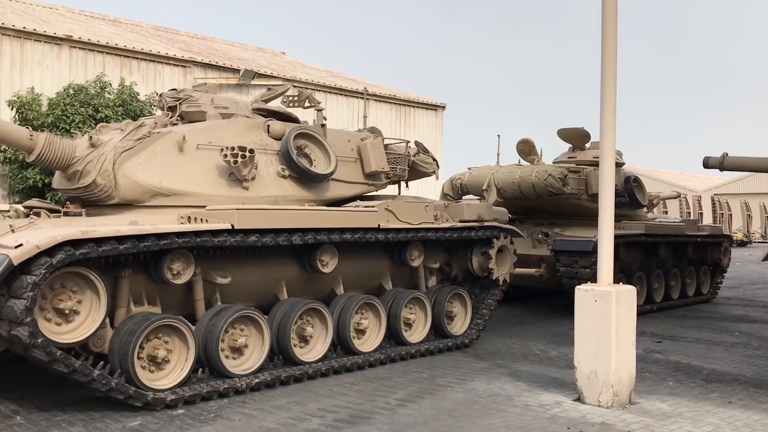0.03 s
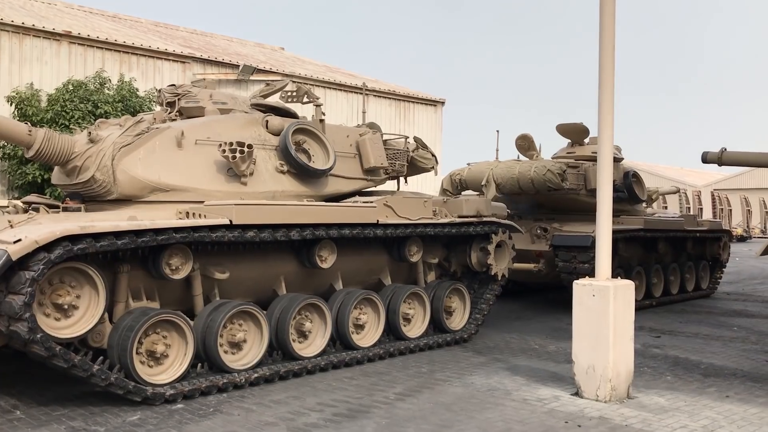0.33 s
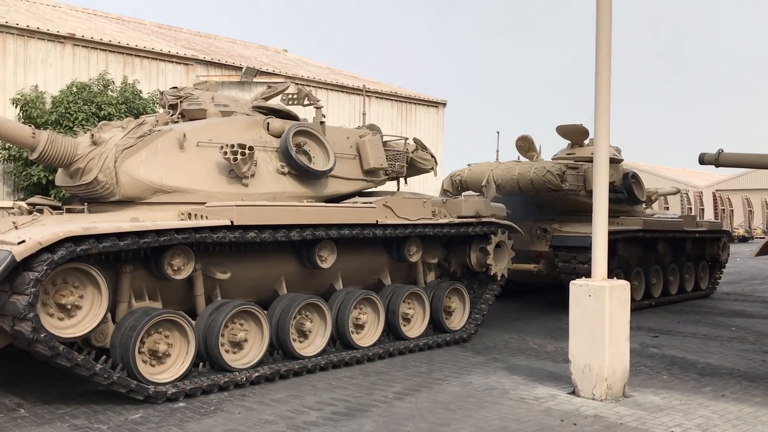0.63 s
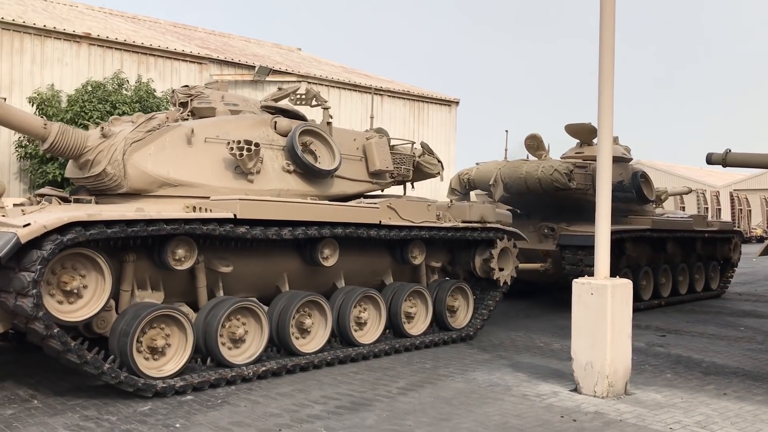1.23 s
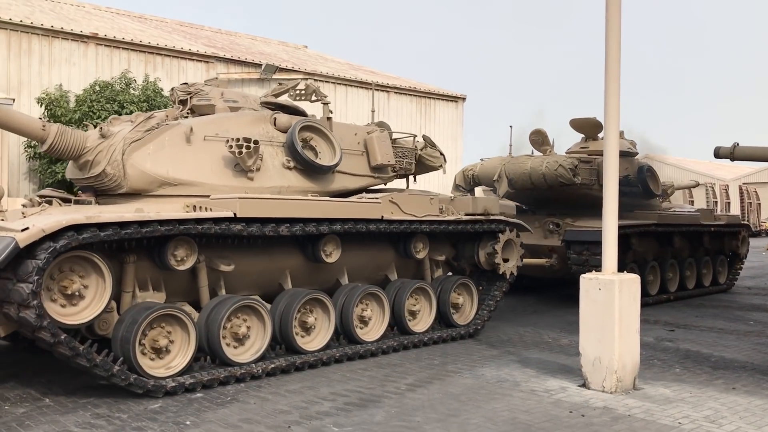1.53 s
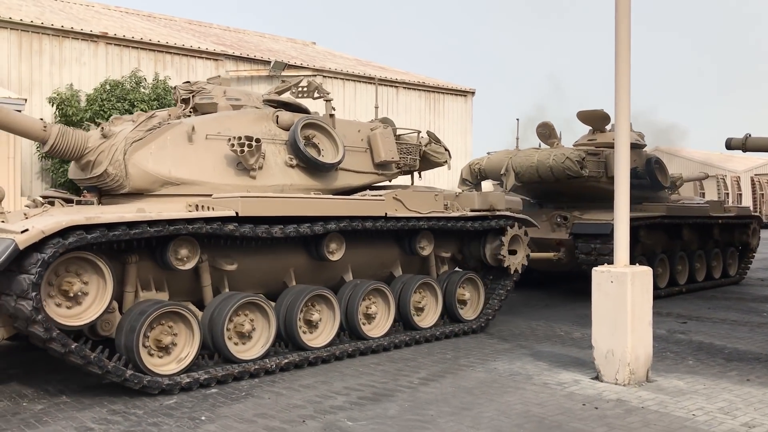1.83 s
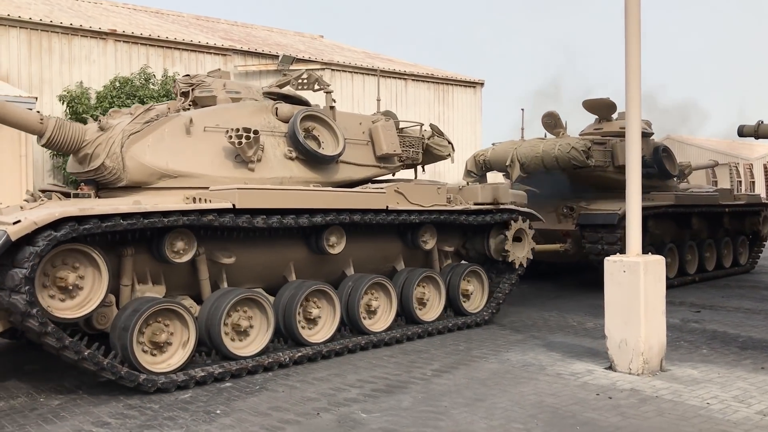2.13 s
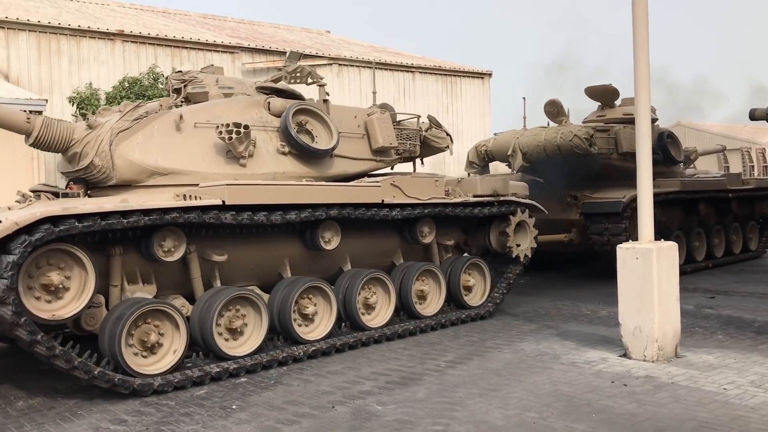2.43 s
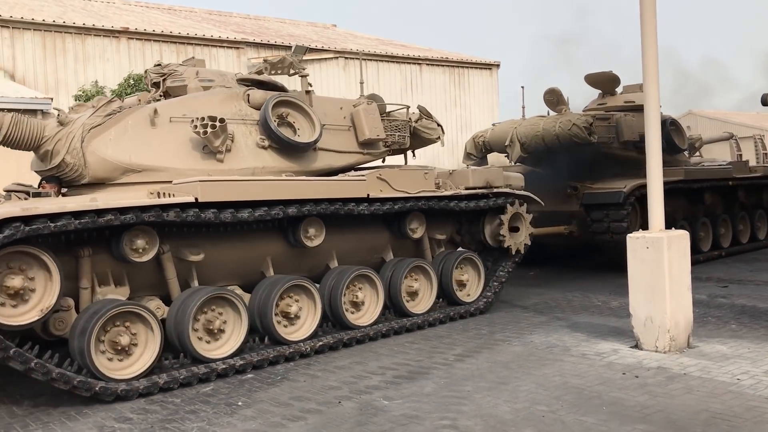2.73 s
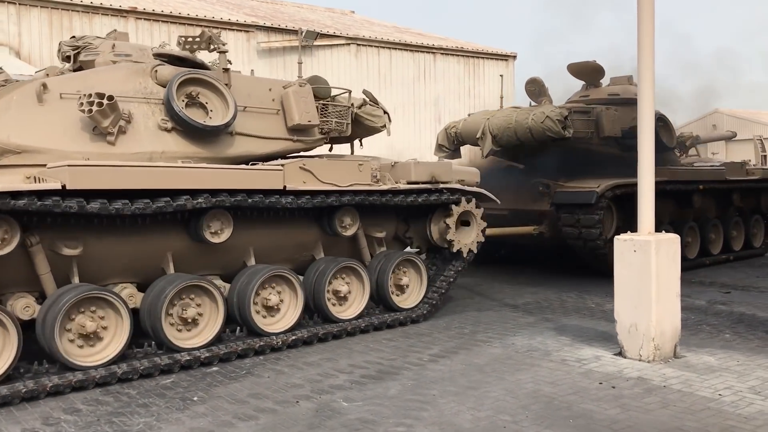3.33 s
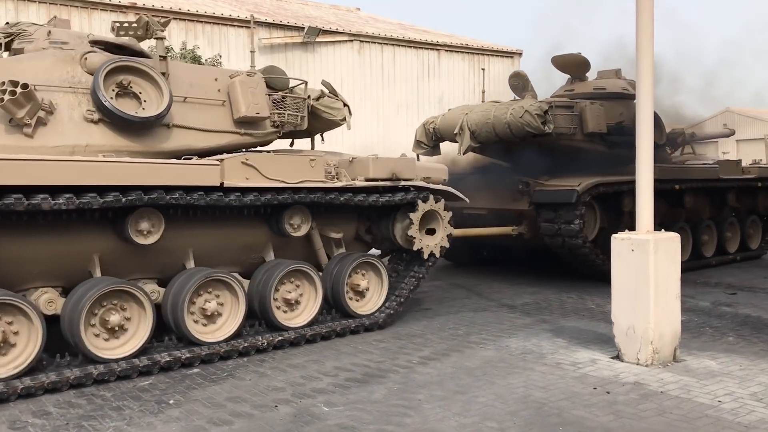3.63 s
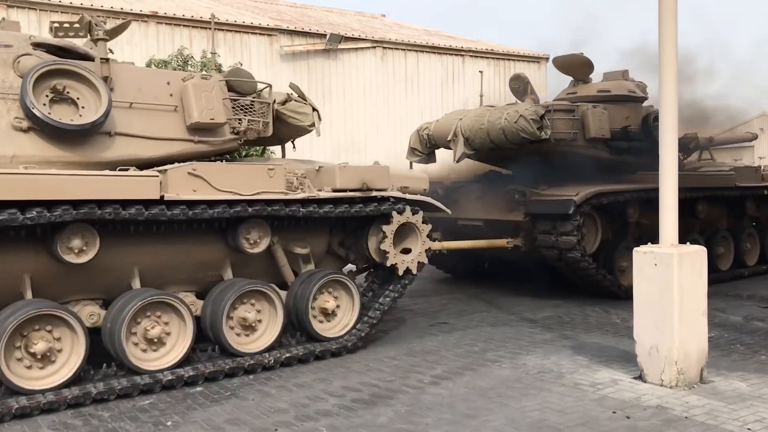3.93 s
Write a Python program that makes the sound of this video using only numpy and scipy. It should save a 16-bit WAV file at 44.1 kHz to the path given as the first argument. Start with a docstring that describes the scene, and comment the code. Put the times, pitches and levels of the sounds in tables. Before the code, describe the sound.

Tank engine rumbling and revving up as it pulls away on clanking steel tracks.

```python
"""Tank pulling away

A turbocharged diesel revs, sags while the drive takes up with clanks and a shudder, then pulls up
to speed as the tank rolls off over a paved yard. The exhaust throbs on the crankshaft's low orders
under a puffing roar, the turbochargers whine upward, and the steel tracks grind, slap and jingle."""
import sys
import numpy as np
from scipy import signal
from scipy.fft import rfft, irfft
from scipy.io import wavfile
from scipy.ndimage import uniform_filter1d

SR = 44100
rng = np.random.default_rng(int(sys.argv[2]) if len(sys.argv) > 2 else 0)


def int16_out(signal):
    """Quantize to a 16-bit WAV file."""
    q = np.round(np.clip(np.atleast_2d(signal).T, -1, 1) * 32767)
    wavfile.write(sys.argv[1], SR, q.astype(np.int16))


N = 176400
TIME = np.arange(N) / SR
THROB_HZ, CRITICAL_SPEED_HZ = 21.6, 27.95  # how fast the engine wavers; crank speed where it stumbles
LINK_DECAY_S = 0.022


def amp(db):
    """Decibels to gain."""
    return 10 ** (np.asarray(db) / 20)


def unit(x):
    """Scales to rms 1."""
    return x / np.sqrt(np.mean(x ** 2) + 1e-20)


def bell(x, centre, width):
    """A bump of height 1 around centre."""
    return np.exp(-((x - centre) / width) ** 2)


def curves(table):
    """One automation curve per column after the time, in straight ramps."""
    times, *columns = np.transpose(table)
    return [np.interp(TIME, times, column) for column in columns]


def noise(spectrum):
    """Noise of rms 1 with the given colour."""
    hz, db = np.transpose(spectrum)
    gain = amp(np.interp(np.log(np.fft.rfftfreq(N, 1 / SR) + 1), np.log(hz), db))
    return unit(irfft(rfft(rng.standard_normal(N)) * gain, N))


def wander(hz):
    """Random drift of rms 1, rolled off above hz."""
    rolloff = 1 + (np.fft.rfftfreq(N, 1 / SR) / hz) ** 4
    return unit(irfft(rfft(rng.standard_normal(N)) / rolloff, N))


def whistle(hz, width_hz):
    """A narrow band of noise whose pitch and width may move."""
    width = width_hz * np.ones(N)
    clock = np.cumsum(width) / width.mean()  # a wider band flutters faster
    a, b = (np.interp(clock, np.arange(N), wander(width.mean() / 2)) for _ in range(2))
    phase = 2 * np.pi * np.cumsum(hz * np.ones(N)) / SR
    return a * np.cos(phase) + b * np.sin(phase)


def yard(x, wet_db=-6.5, t60_s=0.15):
    """Adds a short scatter from the shed wall and the other vehicles."""
    t = TIME[:SR // 2]
    echoes = rng.standard_normal(len(t)) * (rng.random(len(t)) < .05) * amp(-60 * t / t60_s)
    return x + amp(wet_db) * signal.fftconvolve(x, echoes / np.linalg.norm(echoes))[:N]


# The revs and the main exhaust tones: time_s, crank_hz, order2_db, order3_db, order4_db, order5_db
ENGINE_REVS = [(.08, 22.13, -13, -56, -15, -24.5), (.32, 29.56, -17.5, -24, -12.5, -31.5),
               (.5, 34.05, -22, -22.5, -15.5, -17.5), (.61, 35.1, -21, -38, -29, -54),
               (.68, 35.18, -36, -33, -43, -34), (.96, 32.16, -38.5, -28.5, -40, -62),
               (1.27, 27.53, -40, -33.5, -34, -45), (1.565, 25.07, -44, -32.5, -41, -53),
               (1.585, 22.9, -20, -33, -19.5, -41), (1.655, 23.56, -17, -33, -15.5, -22),
               (1.9, 29.14, -17, -31, -9.5, -30), (2.01, 30.46, -28, -19, -16, -33),
               (2.26, 34.1, -23, -21.5, -16, -23.5), (2.39, 34.83, -22.5, -47, -31.5, -29),
               (2.7, 36.8, -21.5, -20, -26, -26), (3.06, 38.83, -16, -24.5, -27.5, -29.5),
               (3.53, 40.5, -17, -29, -24, -30.5), (3.78, 41.5, -31.5, -37, -23, -27),
               (3.89, 41.38, -21, -24.5, -27, -29.5)]
# Fainter exhaust tones that ride the rumble's level: crank_order, offset_db
WEAK_ORDERS = [(1, -4), (6, -13.5), (7, -13), (8, -23.5), (9, -15.5)]


def exhaust(crank_angle, pipe_hz=112.3, pipe_q=4, throb_db=1.2):
    """Uneven exhaust beats: crankshaft orders, each shifted in phase by the pipe's resonance."""
    speed, second, third, fourth, fifth = curves(ENGINE_REVS)
    stumble_db = -9 * bell(speed, CRITICAL_SPEED_HZ, width=0.96)
    rumble_db = curves(ROAR_LEVELS)[0]
    orders = [(2, second), (3, third), (4, fourth + stumble_db), (5, fifth)]
    orders += [(order, rumble_db + offset_db) for order, offset_db in WEAK_ORDERS]
    out = np.zeros(N)
    for order, db in orders:
        hz = order * speed
        lag = np.arctan(pipe_q * (hz / pipe_hz - pipe_hz / hz))
        level = amp(db + throb_db * wander(THROB_HZ))
        out += np.sqrt(2) * level * np.cos(order * crank_angle - lag)
    return out


# Faders for the engine's three noise layers: time_s, rumble_db, clatter_db, hiss_db
ROAR_LEVELS = [(.08, -21, -25, -29.5), (.33, -23.5, -26, -29.5), (.6, -27, -28, -34.5),
               (.68, -32, -33.5, -44), (.93, -34.5, -31, -42.5), (1.02, -29, -26, -41.5),
               (1.52, -31, -29.5, -44), (1.595, -27, -27, -41.5), (1.63, -19, -24, -29.5),
               (1.92, -25.5, -25.5, -29), (1.99, -24.5, -29, -34), (2.3, -26, -30, -34.5),
               (2.7, -24, -30.5, -33.5), (3.4, -26, -31.5, -34), (4, -24.5, -27.5, -31.5)]
# Their colours, from deep to airy: freq_hz, density_db
RUMBLE_COLOUR = [(25, -32), (60, 2), (110, 8.5), (195, 4.5), (260, -2), (375, -3), (440, -15), (800, -39)]
CLATTER_COLOUR = [(220, -24), (305, 1.5), (445, -6.5), (615, 2.5), (760, 0), (1100, -4.5), (2300, -3.5),
                  (3100, -8), (4200, -11.5), (4900, -22), (16000, -55)]
HISS_COLOUR = [(800, -48), (2800, -3.5), (4200, 0), (4900, -5), (6500, -5.5), (7600, -9.5), (8700, -7.5),
               (9700, -12.5), (10500, -18.5), (16000, -27.5)]


def roar(crank_angle, firing_depth=0.029, turn_depth=0.032, flicker_db=0.7):
    """Rumble, clatter and hiss, puffing with each turn and each firing of a cylinder bank."""
    rumble_db, clatter_db, hiss_db = curves(ROAR_LEVELS)
    pulse = 1 + firing_depth * np.cos(3 * crank_angle) + turn_depth * np.cos(crank_angle)
    puffs = unit(pulse * amp(flicker_db * wander(hz=200)))
    clatter = amp(clatter_db) * unit(yard(noise(CLATTER_COLOUR)))
    rumble = amp(rumble_db) * noise(RUMBLE_COLOUR)
    hiss = amp(hiss_db) * unit(yard(noise(HISS_COLOUR)))
    return puffs * (rumble + clatter + hiss)


def drone(crank_angle, bay_hz=630, bay_width_hz=67, full_load_hz_per_s=36):
    """As the revs climb, rough high orders sweep through a hollow resonance of the engine bay."""
    speed = curves(ENGINE_REVS)[0]
    acceleration = uniform_filter1d(np.gradient(speed) * SR, size=4000)
    load = np.clip(acceleration / full_load_hz_per_s, 0, 1)
    near_critical = bell(speed, CRITICAL_SPEED_HZ, width=4.2)
    growl = np.zeros(N)
    for order in range(20, 28):
        resonance = bell(order * speed, bay_hz, bay_width_hz)
        roughness = 1 + .5 * wander(THROB_HZ)
        growl += resonance * roughness * np.cos(order * crank_angle + 2 * np.pi * rng.random())
    return amp(-33.5) * load * near_critical * growl


# The turbo spools up, trailing the revs: time_s, pitch_hz, level_db, width_hz
TURBO_WHINE = [(.08, 1227, -32.5, 178.6), (.33, 1652, -27, 221.2), (.6, 2037, -34, 203.9),
               (.73, 2187, -38, 147), (1, 2319, -31, 140.8), (1.3, 2337, -35, 162),
               (1.52, 2120, -43, 161.1), (1.66, 2215, -34, 222.7), (1.92, 2390, -28, 149.4),
               (2, 2536, -36, 274.3), (2.27, 2991, -33.5, 451.8), (2.53, 3403, -30.5, 250.7),
               (2.9, 3884, -28, 422.3), (3.5, 4564, -34.5, 455), (4, 5327, -34, 1049)]


def turbo(rush_db=-3):
    """The turbochargers sing: a breathy whine inside a wider rush."""
    hz, db, width = curves(TURBO_WHINE)
    whine = whistle(hz, width)
    rush = amp(rush_db) * whistle(hz, 2.9 * width)
    combined_rms = np.sqrt(1 + amp(rush_db) ** 2)
    return amp(db) * combined_rms * unit(yard(whine + rush))


# Track links knock together: start_s, level_db, decay_s
CLANKS = [(1.007, -26, 0.0098), (1.033, -26, 0.0087), (1.047, -31, 0.074), (1.153, -26, .019),
          (1.178, -31, 0.028), (1.291, -30.5, 0.014), (1.405, -23, 0.0096)]
# The bright crunch of a knocked link: freq_hz, density_db
KNOCK_COLOUR = [(300, -10), (900, 14.5), (2200, -3), (4300, 4.5), (5500, -3.5), (15000, -10.5)]
# Short squeaks of steel on steel: start_s, level_db, decay_s
SQUEAKS = [(1.132, -35, 0.051), (1.21, -47, 0.069), (2.021, -39, 0.017)]
# The thin ring inside a squeak: pitch_hz, width_hz, level_db
SQUEAK_BANDS = [(6300, 460, -1), (7060, 320, -4.5), (9500, 130, -5)]


def clanks_and_squeaks():
    """Steel knocks with a crunch or scrapes with a ring; each jumps in and dies away."""
    crunch = noise(KNOCK_COLOUR)
    ring = sum(amp(db) * whistle(hz, width) for hz, width, db in SQUEAK_BANDS)
    out = np.zeros(N)
    for events, sound in (CLANKS, crunch), (SQUEAKS, ring):
        for start_s, db, decay_s in events:
            envelope = (TIME >= start_s) * np.exp(-np.maximum(TIME - start_s, 0) / decay_s)
            out += amp(db) * envelope * sound
    return out


# Jolts as the drive takes up: peak_s, level_db, rise_s, decay_s
SHUDDERS = [(1.115, -14.5, 0.026, 0.033), (1.398, -22.5, 0.04, 0.047)]
# The hull's booming modes: pitch_hz, level_db
HULL_MODES = [(175, -1), (245.4, -3.5), (323.6, -11.5), (740, -12), (1076, -11)]
# The rattle of loose fittings: freq_hz, density_db
RATTLE_COLOUR = [(200, 9), (500, 3.5), (1100, -5), (2200, -3), (4200, -11.5), (5200, -16), (16000, -33)]


def shudders(waver_depth=0.0371, rattle_db=-0.5, rattle_lag_s=0.018):
    """The hull booms in its low modes, and loose fittings rattle just after."""
    boom = np.zeros(N)
    for hz, db in HULL_MODES:
        pitch = hz * (1 + waver_depth * wander(hz=41))
        boom += amp(db) * np.sin(2 * np.pi * (rng.random() + np.cumsum(pitch) / SR))
    rattle = amp(rattle_db) * noise(RATTLE_COLOUR)
    out = np.zeros(N)
    for peak_s, db, rise_s, decay_s in SHUDDERS:
        for sound, lag_s in (unit(boom), 0), (rattle, rattle_lag_s):
            t = TIME - peak_s - lag_s
            envelope = np.exp(-np.maximum(-t / rise_s, t / decay_s))
            out += amp(db) * envelope * sound
    return out


# The tracks swell as the tank rolls off: time_s, level_db
TRACK_LEVELS = [(1.6, -61), (2.3, -35), (2.75, -30), (3.4, -28.5), (3.7, -27.5), (4, -25)]
# Pads grinding on paving: freq_hz, density_db
GRIND_COLOUR = [(100, -13), (220, -14), (370, 3.5), (480, -8), (680, -0.5), (950, 2), (1250, -7),
                (2200, -3.5), (4200, -12.5), (7500, -20.5), (9000, -19), (10500, -29), (15000, -37)]
# Single connectors chink above the jingle: start_s, level_db
CHINKS = [(2.676, -43), (3.424, -42), (3.548, -41), (3.647, -40), (3.938, -39)]


def tracks(links_per_s=89, slap_db=-10, jingle_db=-20):
    """Links slap the wheels and jingle at random over the steady grinding of pads on the ground."""
    rolling = amp(curves(TRACK_LEVELS)[0])
    strikes = (rng.random(N) < links_per_s / SR).astype(float)
    slap_power = signal.lfilter([1], [1, -np.exp(-2 / (LINK_DECAY_S * SR))], strikes)
    slaps = amp(slap_db) * unit(np.sqrt(slap_power)) * noise(KNOCK_COLOUR)
    hits = amp(jingle_db) * rolling * strikes
    for start_s, db in CHINKS:
        hits[round(start_s * SR)] += amp(db)
    return rolling * (noise(GRIND_COLOUR) + slaps) + jingle(hits)


def jingle(hits, mode_count=24, low_hz=10500, high_hz=15500):
    """Small steel connectors: each hit rings their many high modes in a new mix."""
    out = np.zeros(N)
    for hz in rng.uniform(low_hz, high_hz, mode_count):
        pole = np.exp((2j * np.pi * hz - 1 / LINK_DECAY_S) / SR)
        kicks = hits * rng.standard_normal(N) + 1e-18
        out += signal.lfilter([1], [1, -pole], kicks).imag
    return np.sqrt(2 / mode_count) * out


def scene():
    """One slightly unsteady crankshaft drives exhaust, roar and drone; turbo and running gear join in."""
    speed = curves(ENGINE_REVS)[0] * (1 + 0.005 * wander(THROB_HZ))
    crank_angle = 2 * np.pi * np.cumsum(speed) / SR
    engine = exhaust(crank_angle) + roar(crank_angle) + drone(crank_angle) + turbo()
    return (engine + yard(clanks_and_squeaks()) + shudders() + tracks())[None]


def record(dry):
    """A small microphone loses the deepest bass; the sound cuts in abruptly, its very top shaved off."""
    low_cut_hz, high_cut_hz, start_s = 51.3, 15800, 0.082
    low_cut = signal.butter(4, low_cut_hz, "highpass", fs=SR, output="sos")
    high_cut = signal.firwin(511, high_cut_hz, window=("kaiser", 9), fs=SR)
    gate = np.clip((TIME - start_s) / .002, 0, 1)
    return signal.oaconvolve(gate * signal.sosfilt(low_cut, dry), high_cut[None], "same")


dry = scene()
out = record(dry)
int16_out(out)
```